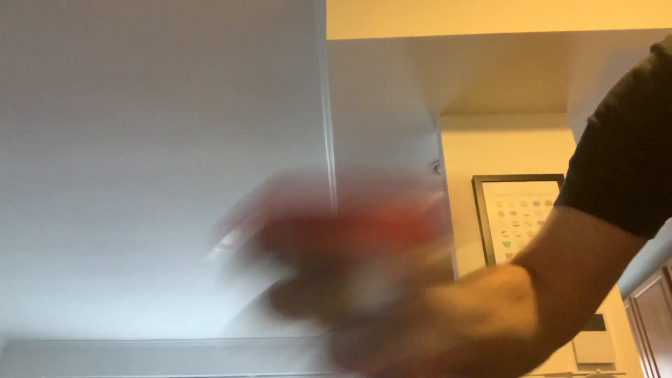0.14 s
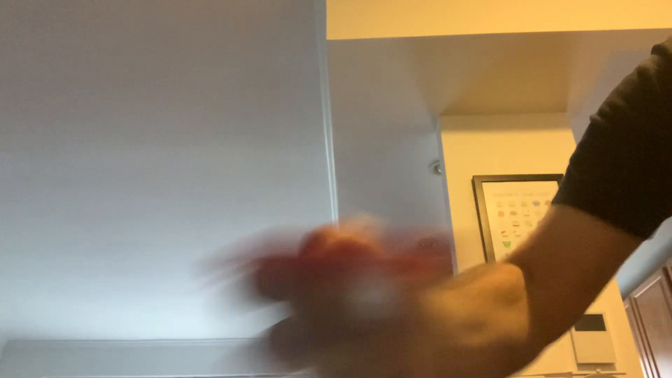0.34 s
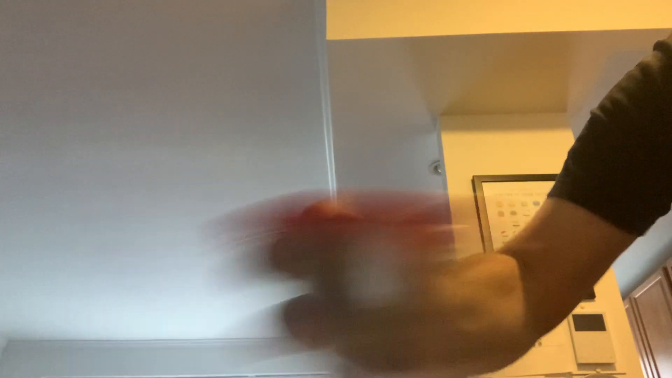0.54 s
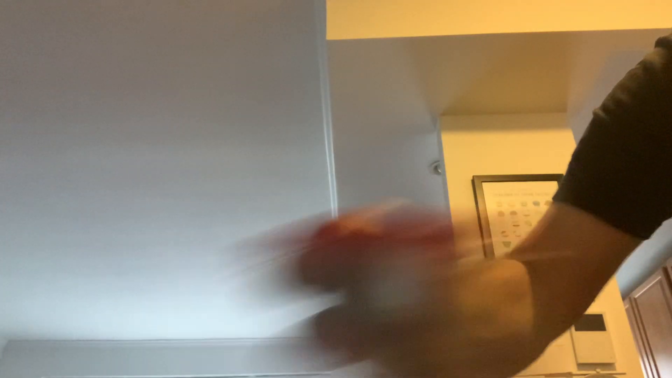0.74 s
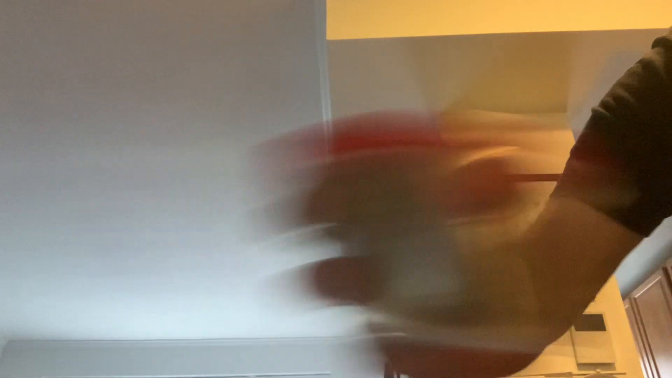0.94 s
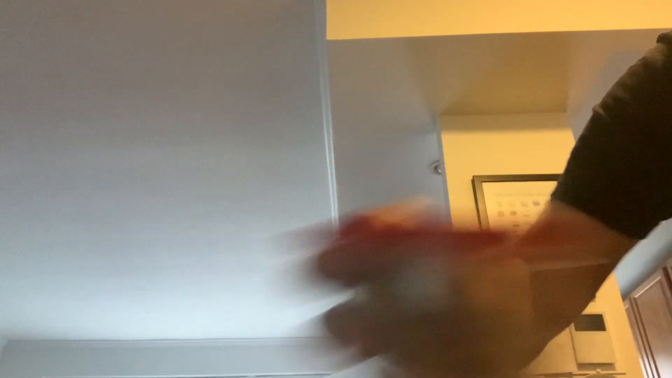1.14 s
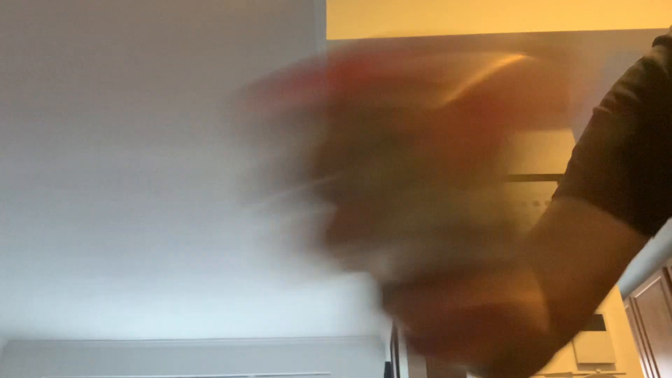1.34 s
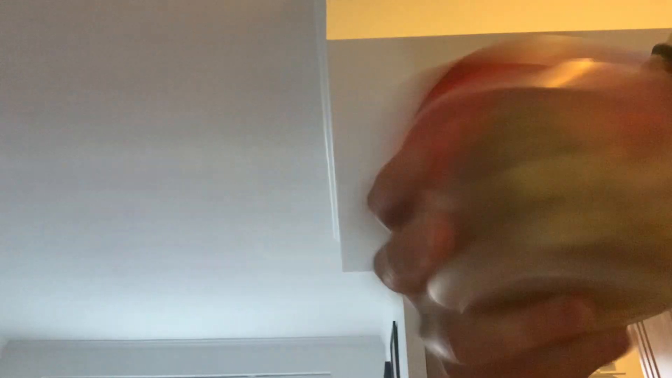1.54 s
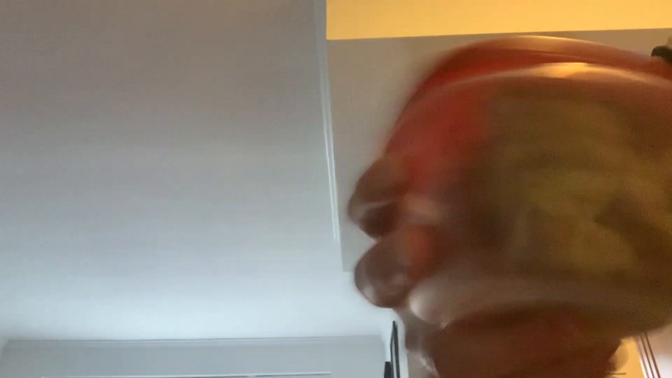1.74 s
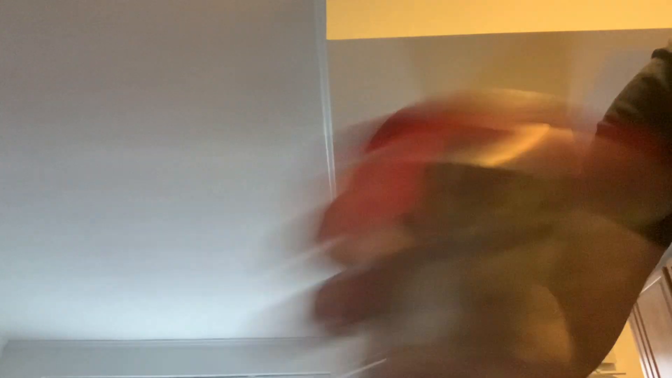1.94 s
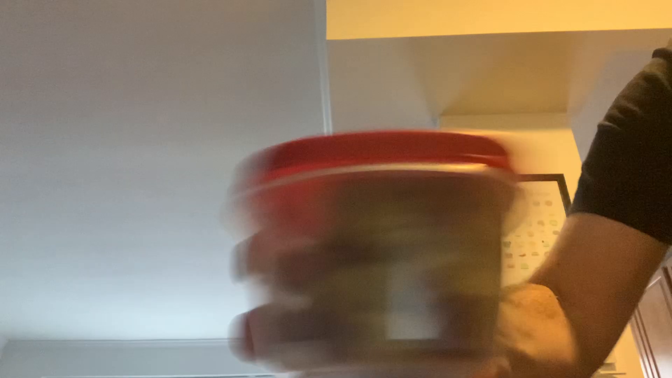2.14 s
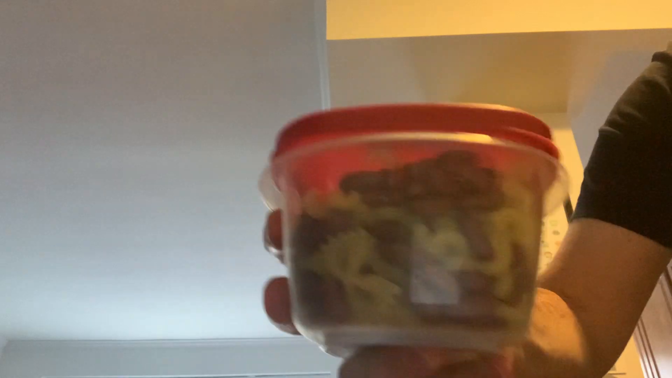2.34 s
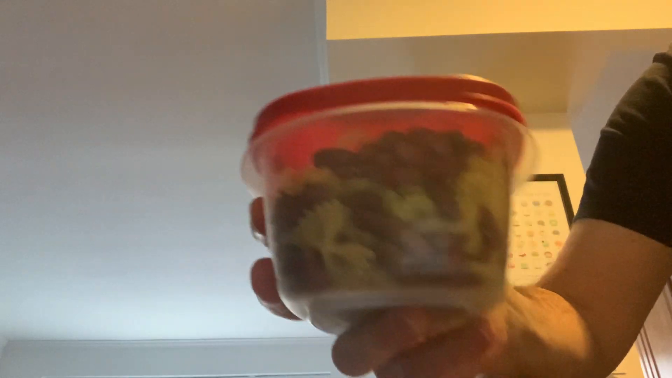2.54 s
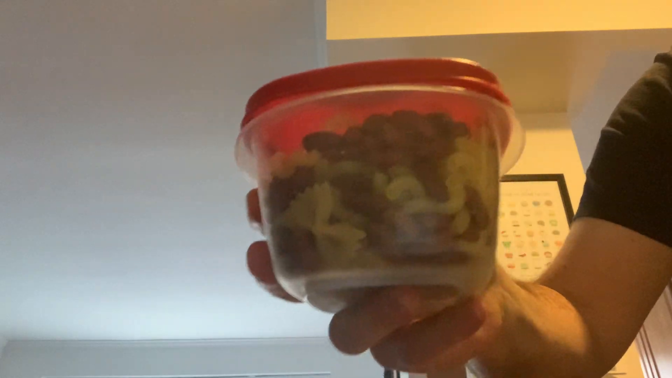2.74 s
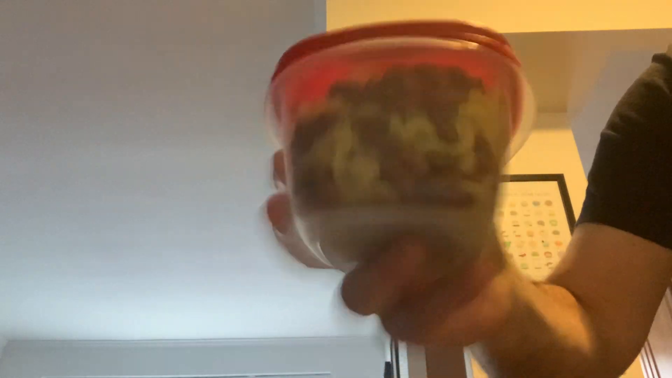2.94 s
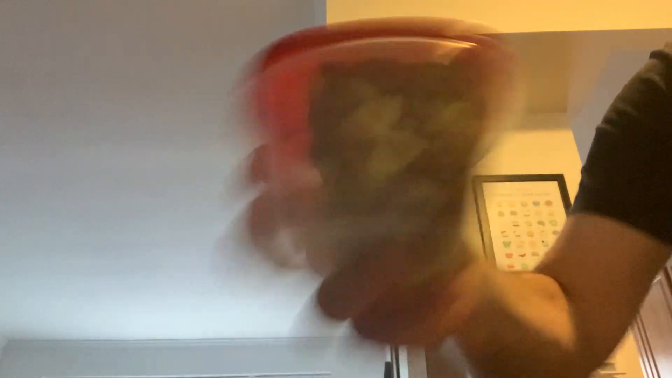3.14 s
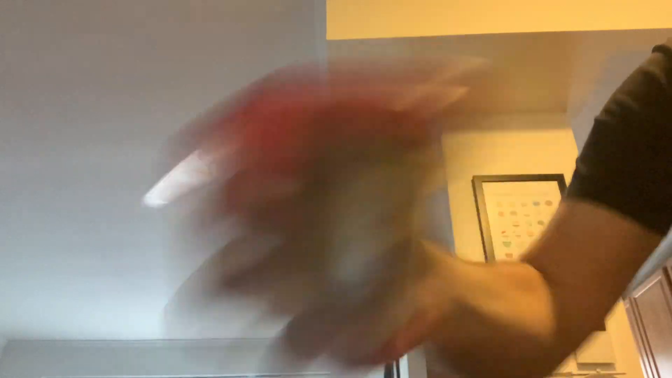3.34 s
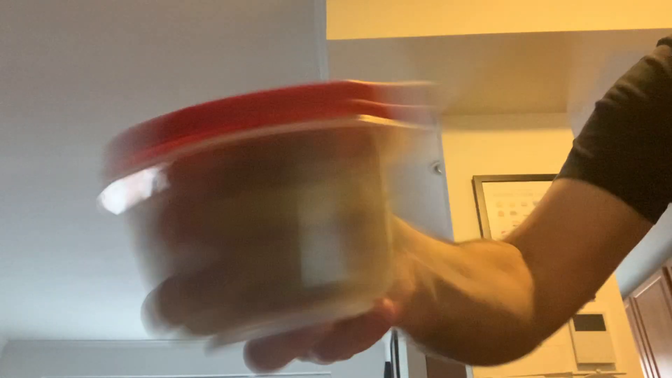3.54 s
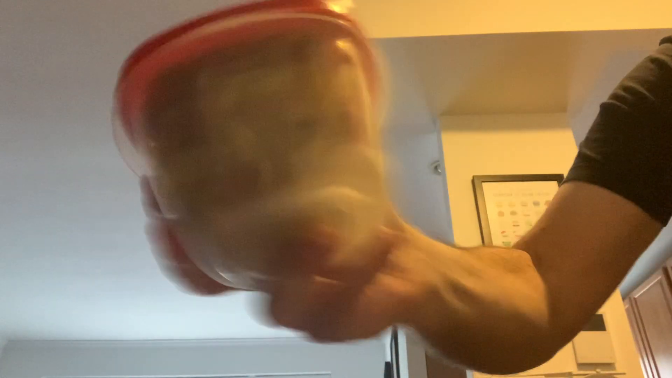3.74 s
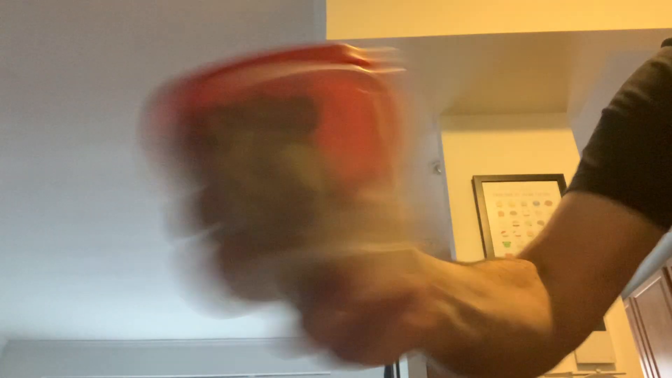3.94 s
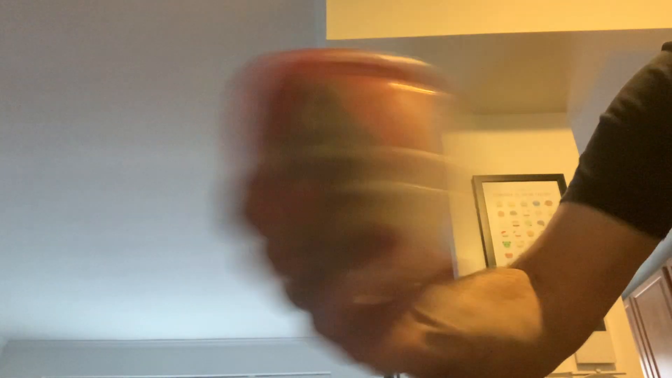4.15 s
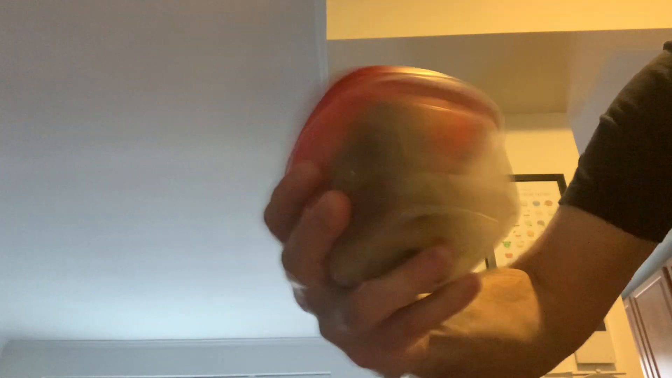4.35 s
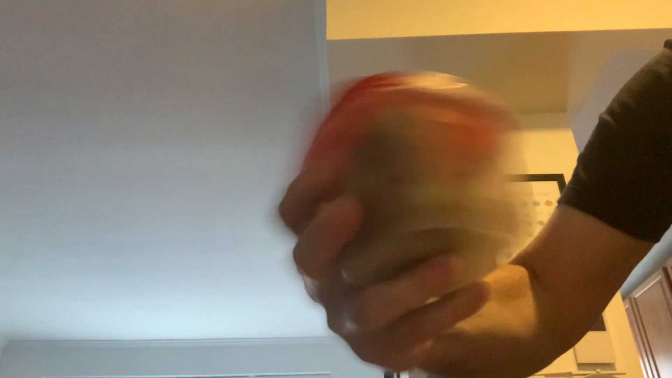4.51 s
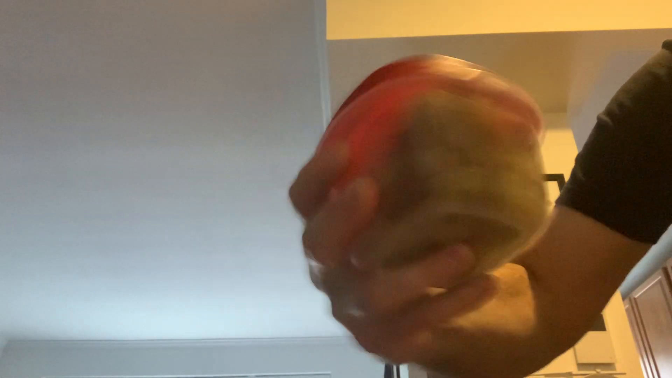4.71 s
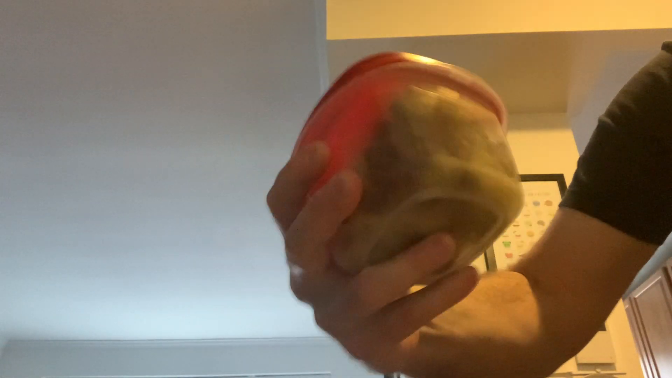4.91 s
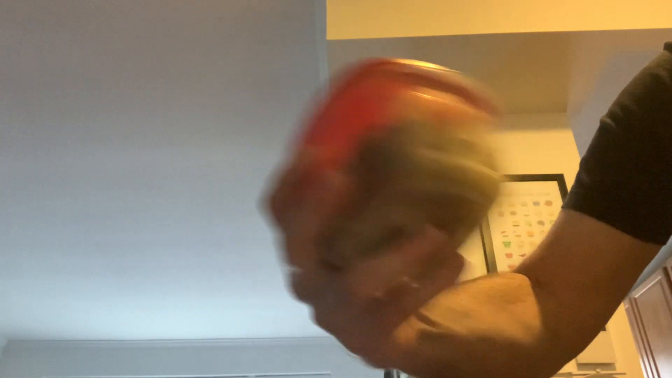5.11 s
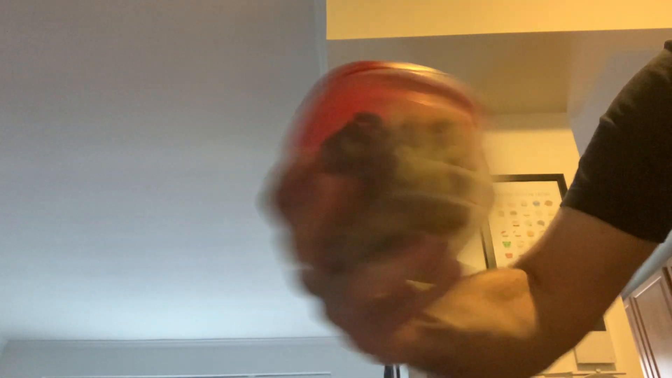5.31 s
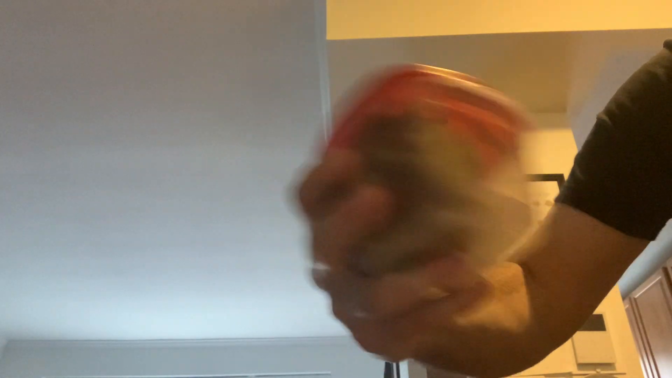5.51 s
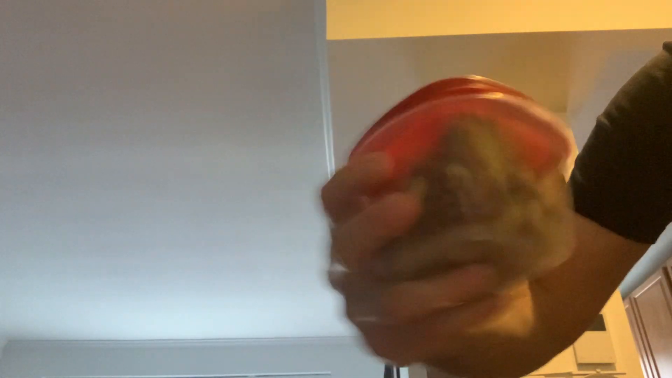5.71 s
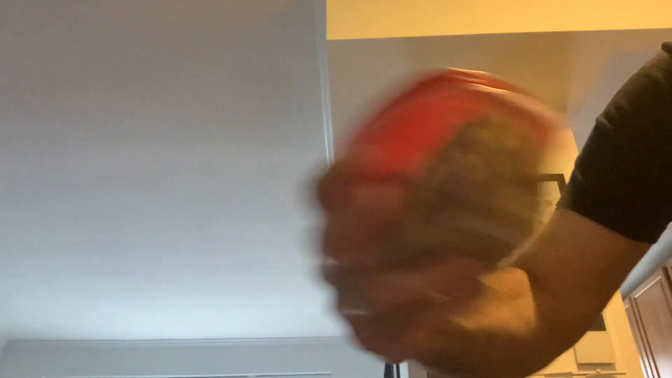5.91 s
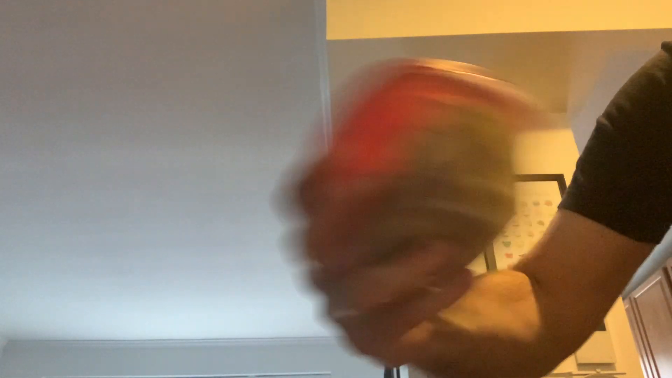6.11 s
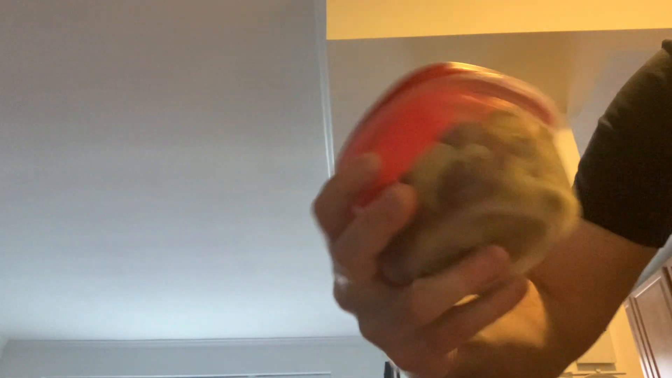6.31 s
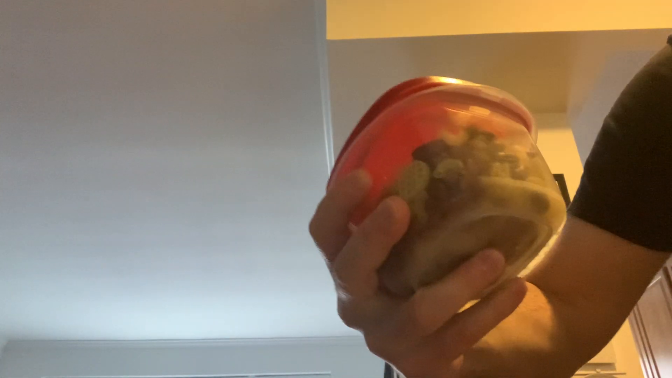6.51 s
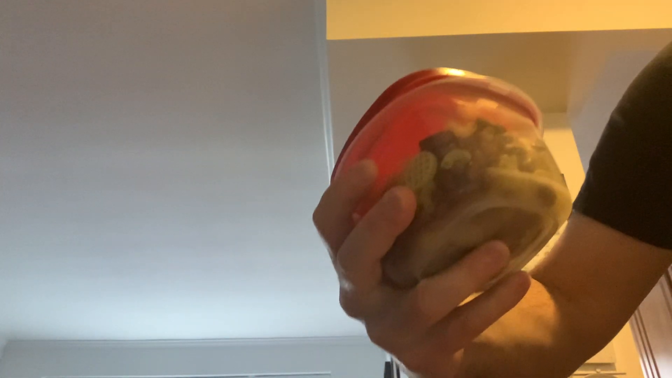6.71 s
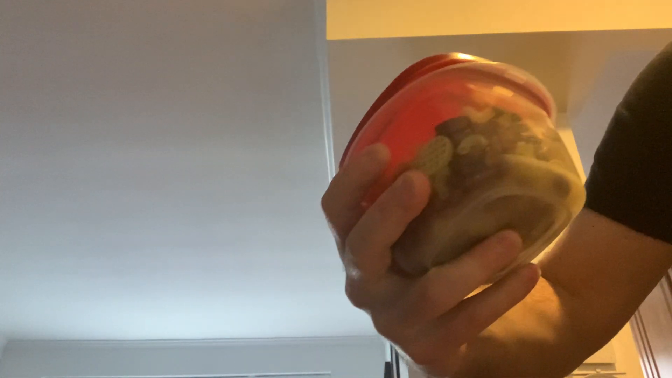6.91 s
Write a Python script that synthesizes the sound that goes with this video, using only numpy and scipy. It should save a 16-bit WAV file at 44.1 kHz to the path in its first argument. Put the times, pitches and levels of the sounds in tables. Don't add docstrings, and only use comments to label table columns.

```python
import sys
import numpy as np
from scipy import signal
from scipy.fft import rfft, irfft, next_fast_len
from scipy.io import wavfile
from scipy.ndimage import map_coordinates

SR = 44100
rng = np.random.default_rng(int(sys.argv[2]) if len(sys.argv) > 2 else 0)


def level_to_linear(level):
    exponent = np.asarray(level, float) / 20
    return 10 ** exponent


def transcribe(signal):
    frames = np.atleast_2d(signal).T
    limited = np.clip(frames, -1, 1)
    pcm = np.round(limited * 32767).astype(np.int16)
    wavfile.write(sys.argv[1], SR, pcm)


N = 307199

# f/Hz, width/Hz, level/dB
WALL = [(1304, 465, -8), (1880, 425, -6.5), (2293, 484, -3.5), (2715, 370, -1), (3490, 860, -4),
        (4670, 1820, -7.5), (5190, 450, -6.5)]
# f/Hz, width/Hz, level/dB
PIECES = [(5660, 960, -13.5), (7290, 870, -5.5), (8866, 1280, -3), (10200, 1310, -2), (11950, 1100, -6),
          (12690, 4200, -12)]
# f/Hz, width/Hz, level/dB
SHELL = [(203.7, 28, -10.5), (252.4, 71, -7.5), (320, 132, -3), (390, 86, 1), (480, 57.5, -1),
         (700, 370, -3.5), (820, 133, -2)]
# f/Hz, width/Hz, level/dB
LID_HUM = [(390, 28, -4)]


def unit(x):
    return x / np.sqrt(np.mean(x ** 2) + 1e-20)


def along(points, hz):
    f, v = np.transpose(points)
    return np.interp(np.log(hz + 1), np.log(f + 1), v)


def curves(tables):
    s, *cols = np.transpose(np.vstack(tables))
    return [np.interp(np.arange(N) / SR, s, c) for c in cols]


def filtered(x, response):
    m = next_fast_len(N + SR // 2)
    return irfft(rfft(x, m) * response(np.fft.rfftfreq(m, 1 / SR)), m)[..., :N]


def resonant(x, modes):
    out = 0
    for k, (hz, width, db) in enumerate(modes):
        b, a = signal.iirpeak(hz, hz / width, SR)
        out = out + (-1) ** k * level_to_linear(db) * signal.lfilter(b, a, x)
    return out


def wobble(rate):
    knots = rng.standard_normal(int(N * rate / SR) + 4)
    return map_coordinates(knots, [np.arange(N) * rate / SR])


def add_burst(power, s, db, length, rise, fall):
    first = max(round((s - .024) * SR), 0)
    t = np.arange(first, min(first + SR // 5, N)) / SR - s
    shape = np.exp(np.minimum(t, 0) / rise - np.maximum(t - length, 0) / fall)
    power[first:first + len(t)] += level_to_linear(db) ** 2 * shape


def house():
    # t/s, level/dB, rise/s, fall/s
    swells = [
        (2.64, -64, .03, 0.048),
        (2.79, -57, .07, .04),
        (6.58, -67, 0.17, .12),
        (6.905, -65, .01, .04),
    ]
    t = np.arange(N) / SR
    gain = level_to_linear(-86.5)
    for s, db, rise, fall in swells:
        gain = gain + level_to_linear(db) * np.exp(np.minimum(t - s, 0) / rise - np.maximum(t - s, 0) / fall)
    return gain


def background():
    # f/Hz, level/dB per Hz
    hush = [(15, -46), (25, -18), (43, -9), (64, -5), (97, -23.5), (137, -0.5), (175, -10), (416, -16.5),
            (1020, -25), (2550, -36), (5430, -34.5), (9570, -29), (16000, -41.5)]
    # f/Hz, level/dB per Hz
    rumble = [(35, -46), (60, -16), (96, -17), (111, -7), (134, 3), (148, 1.5), (163, -23), (258, -5.5),
              (398, 11.5), (560, -8.5), (700, -28), (910, -57.5), (1540, -120)]
    noise = lambda spectrum: unit(filtered(rng.standard_normal(N), lambda hz: level_to_linear(along(spectrum, hz))))
    return level_to_linear(-64) * noise(hush) + house() * noise(rumble)


def tumble():
    # start t/s, end t/s, rolling level/dB, settling/dB per s
    bouts = [
        (0, 2.37, -29.5, 220.5),
        (3.15, 6.33, -33, 96.5),
    ]
    still_db = -78.5
    t = np.arange(N) / SR
    top, fall = np.zeros((2, N))
    for first, last, db, settle in bouts:
        now = t >= first
        top[now] = db
        fall[now] = np.clip(settle * (t[now] - last), 0, db - still_db)
    return top - fall, top - 10 - 0.85 * fall


def throws():
    # t/s, level/dB, length/ms
    out_first = [(.062, -17.5, 29), (.274, -15.5, 25), (.471, -16.5, 36), (.658, -18.5, 47),
                 (.864, -17.5, 17), (1.054, -16, 27), (1.259, -15, 10), (1.441, -17.5, 24), (1.63, -15, 20),
                 (1.815, -13.5, 9), (1.99, -14, 8.5), (2.161, -16.5, 22)]
    # t/s, level/dB, length/ms
    back_first = [(.166, -17, 28), (.376, -15.5, 32), (.562, -16.5, 36), (.754, -16.5, 41),
                  (.946, -16.5, 45), (1.144, -16, 45), (1.352, -14, 24), (1.532, -14, 19.5),
                  (1.712, -14, 18), (1.897, -13.5, 9.2), (2.067, -16.5, 13), (2.256, -17.5, 16)]
    # t/s, level/dB, length/ms
    out_second = [(3.035, -20, 30), (3.194, -20, 44), (3.36, -17.5, 40), (3.523, -16.5, 43),
                  (3.717, -15.5, 29), (3.887, -17.5, 25), (4.075, -16.5, 33), (4.26, -15.5, 25),
                  (4.43, -19, 44), (4.604, -16, 12), (4.785, -16.5, 24), (4.98, -18.5, 7.9),
                  (5.144, -23, 30), (5.316, -19.5, 10), (5.47, -17, 13), (5.626, -17, 18),
                  (5.792, -16.5, 23), (5.962, -15, 15), (6.131, -16.5, 21), (6.286, -22, 61)]
    # t/s, level/dB, length/ms
    back_second = [(3.09, -13.5, 24), (3.269, -14.5, 15), (3.446, -15.5, 17), (3.628, -16.5, 27),
                   (3.806, -16.5, 39), (3.988, -14, 15), (4.175, -14.5, 9.6), (4.351, -15.5, 21),
                   (4.516, -17, 29), (4.696, -14.5, 8), (4.875, -18, 19), (5.078, -23.5, 19),
                   (5.235, -24.5, 35), (5.389, -20.5, 33), (5.556, -17.5, 24), (5.716, -19, 17),
                   (5.884, -15.5, 16), (6.047, -17, 20), (6.224, -15, 20)]
    # t/s, piece-over-wall level/dB
    facing = [(0, 3.5), (.75, 5), (1.05, 3), (2.2, 5), (3.03, 1.5), (3.8, 6), (5.1, 6), (5.3, 4),
              (6.1, 6.5), (6.3, 4.5)]
    # start t/s, end t/s
    round_spans = [
        (0, .2),
        (5.2, 6.2),
    ]
    swings = [  # rows, lead-in dB, landing rise in s
        (out_first, -14, .0035),
        (back_first, -17.5, .0019),
        (out_second[:1], -30, .0019),
        (out_second[1:], 1, .0041),
        (back_second, -17.5, .0019)]
    rows = []
    for swing, lead_db, rise in swings:
        for s, db, ms in swing:
            bright_db = np.interp(s, *np.transpose(facing))
            slide_db = -5.5 - 2.5 * np.log2(ms / 24)
            rounder = any(a < s < b for a, b in round_spans)
            rows.append((s, db, ms, bright_db, lead_db, slide_db, rise * (3.5 if rounder else 1)))
    return rows


def contacts(rate, spread_db):
    chance = rng.random(N)
    size = np.minimum(rng.exponential(1, N), 3.2)
    sign = rng.choice([-1, 1], N)
    return unit((chance < rate / SR) * level_to_linear(spread_db * size) * sign / np.sqrt(rate))


def struck(blows, modes, scatter, scatter_db, stay, count):
    favoured = np.repeat(rng.integers(count, size=N // 900 + 1), 900)[:N]
    spot = np.where(rng.random(N) < stay, favoured, rng.integers(count, size=N))
    draw = rng.standard_normal((count, len(modes), 2))
    mean_gain = np.linalg.norm(resonant(signal.unit_impulse(SR // 10), modes))
    out = 0
    for k, shifts in enumerate(draw):
        own = [(hz * np.exp(scatter * a), width, db + scatter_db * b)
               for (hz, width, db), (a, b) in zip(modes, shifts)]
        out = out + resonant(blows * (spot == k), own)
    return out / mean_gain


def rattle():
    # t/s, level/dB
    rebounds = [(.31, -11.5), (0.416, -12.5), (.894, -6.5), (1.486, -9.5), (1.5, -26), (1.706, -28),
                (1.931, -12), (2.095, -10.5), (3.03, -25.5), (3.132, -17), (3.241, -9.5), (3.92, -5),
                (4.632, -8), (4.914, -12), (5.344, -15), (6.081, -19)]
    rolling_db, shell_db = tumble()
    wall = level_to_linear(rolling_db - 3.5) ** 2
    pieces = level_to_linear(rolling_db - 4.5) ** 2
    shell = level_to_linear(shell_db - 3.5) ** 2
    for s, db, ms, bright_db, lead_db, slide_db, landing in throws():
        length = ms / 1000
        for power, share_db in ((wall, -4 - bright_db / 2), (pieces, -3.5 + bright_db / 2)):
            level = db + share_db
            add_burst(power, s, level + lead_db - 7.5, 0, rise=.01, fall=.00051)
            add_burst(power, s, level, length, rise=landing, fall=.0036)
            add_burst(power, s + .0024, level - 5.5, 0, rise=.0019, fall=.016)
            add_burst(power, s + length, level + slide_db + 2, 0, rise=.00039, fall=.0093)
        add_burst(shell, s, db - 17, length, rise=.003, fall=.011)
    for s, db in rebounds:
        add_burst(wall, s - .002, db - 14.5, .004, rise=.0043, fall=.0044)
        add_burst(pieces, s - .002, db - 10.5, .004, rise=.0023, fall=.004)

    clumps = unit(level_to_linear(1.6 * wobble(300) + .4 * wobble(70)))
    busy = np.interp(10 * np.log10(wall + pieces), [-50, -30], [500, 4000])
    shower = contacts(busy, spread_db=5.5)

    def scrape(share):
        return clumps * (np.sqrt(1 - share) * shower + np.sqrt(share) * rng.standard_normal(N))

    on_wall, on_pieces = scrape(.2), scrape(.12)
    ringing = struck(np.sqrt(wall) * on_wall, WALL, scatter=.061, scatter_db=2.5, stay=.8, count=6)
    clicking = struck(np.sqrt(pieces) * on_pieces, PIECES, scatter=.035, scatter_db=2.5, stay=.6, count=6)
    stirs = np.sqrt(shell) * contacts(900, spread_db=5)
    stirring = struck(stirs, SHELL, scatter=.047, scatter_db=3, stay=.6, count=3)
    return ringing - clicking + stirring + resonant(stirring, LID_HUM)


def room(x):
    # f/Hz, t60/s
    decay = [(150, 0.08), (1000, 0.6), (4000, 0.43), (10000, 0.39), (15000, 0.12)]
    out = np.zeros(N + 2 * SR)
    step = round(.3 * SR)
    for first in range(0, N, step):
        hz, t, z = signal.stft(rng.standard_normal(SR * 3 // 4), SR, nperseg=256)
        fading = level_to_linear(-60 * t / along(decay, hz)[:, None])
        tail = signal.istft(z * fading, SR, nperseg=256)[1]
        echo = signal.fftconvolve(x[first:first + step], tail / np.linalg.norm(tail))
        out[first + 250:][:len(echo)] += echo
    return out[:N]


def drums():
    # t/s, level/dB, f/Hz
    first_thumps = [(0.02, -25.5, 399), (0.047, -24.5, 411), (0.085, -27, 775), (0.175, -26.5, 794),
                    (0.209, -22, 356), (0.275, -28, 540), (0.403, -20, 398), (0.498, -24, 660),
                    (0.597, -20.5, 424), (0.686, -23.5, 784), (0.79, -22.5, 434), (0.883, -25.5, 710),
                    (0.985, -26, 467), (1.079, -25.5, 700.0), (1.196, -24, 320.0), (1.273, -23, 618),
                    (1.384, -19.5, 415), (1.474, -26.5, 800), (1.561, -22.5, 390.0), (1.647, -27.0, 610),
                    (1.728, -29.5, 404), (1.753, -26, 420), (1.828, -29, 410), (1.931, -26.5, 505),
                    (1.999, -25, 580), (2.093, -20.5, 400), (2.177, -23.5, 778), (2.281, -29.5, 364)]
    # t/s, level/dB, f/Hz
    later_thumps = [(3.061, -17, 651), (3.207, -22, 334), (3.3, -30, 346), (3.387, -18.5, 480.0),
                    (3.485, -19, 377), (3.546, -22.5, 450), (3.662, -22.5, 408), (3.752, -21.5, 462),
                    (3.807, -30, 658), (3.849, -31, 488), (3.928, -22, 363), (3.971, -28.5, 378),
                    (4.124, -25, 344), (4.308, -29, 394), (4.367, -33.5, 600), (4.484, -32.5, 367),
                    (4.638, -22.5, 370), (4.812, -25.5, 361), (5.093, -30, 382), (5.256, -26.5, 700.0),
                    (5.416, -26.5, 372), (5.564, -23.5, 370), (5.626, -33.5, 800), (5.734, -20.5, 792),
                    (5.826, -25, 384), (5.895, -29, 440), (5.989, -21, 390.0), (6.061, -28.5, 700.0),
                    (6.17, -26.5, 353), (6.236, -30.5, 624)]
    # t/s, level/dB, f/Hz
    double_thumps = [
        (3.046, -21, 339),
        (3.205, -17.5, 700),
        (3.383, -23, 700),
        (5.73, -27.5, 410),
        (5.001, -36.5, 351),
        (5.25, -30, 330),
    ]
    pitched, lid, base = np.zeros((3, N + SR))
    t = np.arange(SR // 12) / SR
    swell = (t / .0059) * np.exp(1 - t / .006)
    for s, db, hz in first_thumps + later_thumps + double_thumps:
        turn = 2 * np.pi * (hz * t * (1.02 - 1.48 * t) + rng.random())
        start = round((s - .008) * SR)
        pitched[start:][:len(t)] += level_to_linear(db) * swell * np.sin(turn)
        panel = lid if hz < 560 else base
        panel[start:][:len(t)] += level_to_linear(db + 20) * swell * rng.standard_normal(len(t))
    lid_thud = resonant(lid[:N], SHELL[:5]) + resonant(lid[:N], LID_HUM)
    return pitched[:N] + lid_thud + resonant(base[:N], SHELL)


def jolts():
    # f/Hz, width/Hz, level/dB
    low_modes = [(75, 36, -6.5), (129, 40, 5.5), (165, 40, -1.5)]
    # t/s, level/dB
    arm_force = [(0, -54), (2.3, -54), (3.0, -48), (4.1, -58.5), (4.4, -74), (6.3, -59)]
    power = np.zeros(N)
    for s, db, ms, *_ in throws():
        add_burst(power, s, db, ms / 1000, rise=.008, fall=.019)
    push = np.sqrt(power) * rng.standard_normal(N)
    thud = resonant(resonant(push, low_modes), [(100, 160, 0)])
    return level_to_linear(curves([arm_force])[0]) * unit(thud)


def ticks():
    # t/s, peak level/dB, f/Hz, click over ring level/dB
    first_drops = [(2.3094, -26.5, 3540, -8), (2.3385, -17, 3350, -14), (2.3514, -17.5, 1400, -13),
                   (2.3764, -15.5, 1360, -16.5), (2.3896, -14.5, 1360, -18), (2.4282, -18.5, 10950, -3),
                   (2.4444, -31, 2670, -21), (2.4597, -29, 2650, -11), (2.4841, -25, 2970, -3),
                   (2.494, -32, 2570, -4), (2.528, -28, 2580, -5), (2.5498, -18.5, 3300, -11.5),
                   (2.5654, -30, 2860, -18), (2.5866, -34.5, 6310, -26), (2.605, -36, 2310, -23.5),
                   (2.6993, -58.5, 1385, 1), (2.7225, -28, 10200, -13)]
    # t/s, peak level/dB, f/Hz, click over ring level/dB
    last_drops = [(6.4432, -38, 7260, -10), (6.47, -21, 4940, -12), (6.4942, -19, 2720, -9.5),
                  (6.5037, -18, 10200, -10), (6.517, -21, 1660, -15), (6.5334, -28, 2680, -18),
                  (6.5446, -24.5, 2520, -14), (6.5524, -31.5, 2620, -19), (6.5604, -37.5, 9900, -16),
                  (6.572, -35, 11200, -7), (6.583, -31, 2390, -24), (6.6308, -53.5, 2450, -36),
                  (6.6374, -42, 3390, -21), (6.652, -26, 9900, -5), (6.66, -17, 11900, -4),
                  (6.6812, -21.5, 7230, -8.5), (6.7033, -19.5, 10200, -8.5), (6.709, -22.5, 6300, -8),
                  (6.729, -25, 10000, -9.5), (6.7753, -31, 7350, -6), (6.861, -38, 3930, -4),
                  (6.885, -36, 1960, -25)]
    # t/s, peak level/dB
    stray_clicks = [
        (4.9836, -5),
        (5.0539, -11),
        (5.0602, -7),
        (5.0854, -8.5),
    ]
    strays = [(s, db - 1.5, 10500, -3) for s, db in stray_clicks]
    tone, click, knock = np.zeros((3, N + SR))
    t = np.arange(SR // 50) / SR
    for s, db, hz, click_db in first_drops + last_drops + strays:
        start = round(s * SR)
        crack = rng.standard_normal(len(t)) * level_to_linear(-60 * t / .0023)
        tone[start:][:len(t)] += level_to_linear(db - 9.5) * np.sin(2 * np.pi * hz * t) * level_to_linear(-60 * t / .009)
        click[start:][:len(t)] += level_to_linear(db + click_db + 17.5) * crack
        knock[start:][:len(t)] += level_to_linear(db + 6) * crack
    knocking = resonant(knock[:N], WALL) + level_to_linear(-5.5) * resonant(knock[:N], SHELL)
    return tone[:N] + resonant(click[:N], PIECES) + knocking


def creak():
    # t/s, level/dB, f/Hz
    squeak = [
        (6.901, -84, 1700),
        (6.935, -61, 1770),
        (6.96, -63, 1890),
    ]
    db, hz = curves([[(6.88, -120, 1666)], squeak])
    turn = 2 * np.pi * np.cumsum(hz) / SR
    return level_to_linear(db) * (wobble(150) * np.sin(turn) + level_to_linear(-5) * wobble(250) * np.sin(1.46 * turn))


def scene():
    # f/Hz, level/dB
    mic_tone = [(30, -16), (250, -2), (1000, -3), (1500, -0.5), (3000, -0.5), (5500, 0), (8000, -0.5),
                (11000, -2.5), (14000, -3), (16000, -12)]
    tub = rattle() + drums() + jolts() + ticks() + creak()
    heard = filtered(tub + level_to_linear(-13) * room(tub), lambda hz: level_to_linear(along(mic_tone, hz)))
    return (heard + background())[None]


def band_limit(x):
    return signal.sosfilt(signal.butter(12, 16230, fs=SR, output="sos"), x)


def record(dry):
    rounded = dry / (1 + np.abs(dry / .56) ** 5) ** (1 / 5)
    passed = lambda hz: (hz < 16100) * hz ** 2 / (hz ** 2 + 45 ** 2)
    return band_limit(filtered(rounded, passed))


dry = scene()
out = record(dry)
transcribe(out)
```